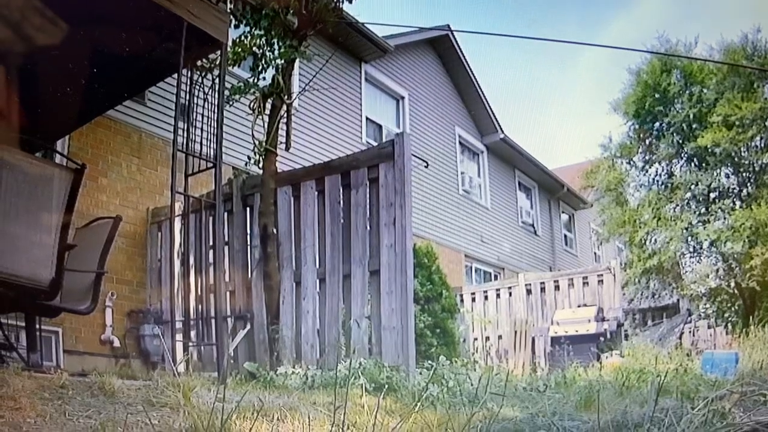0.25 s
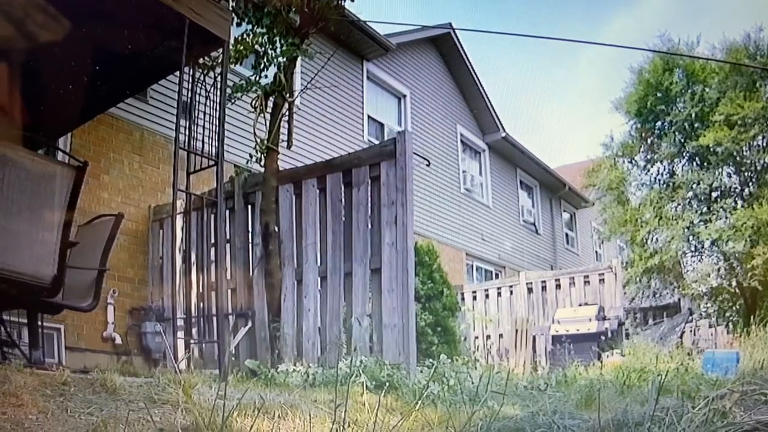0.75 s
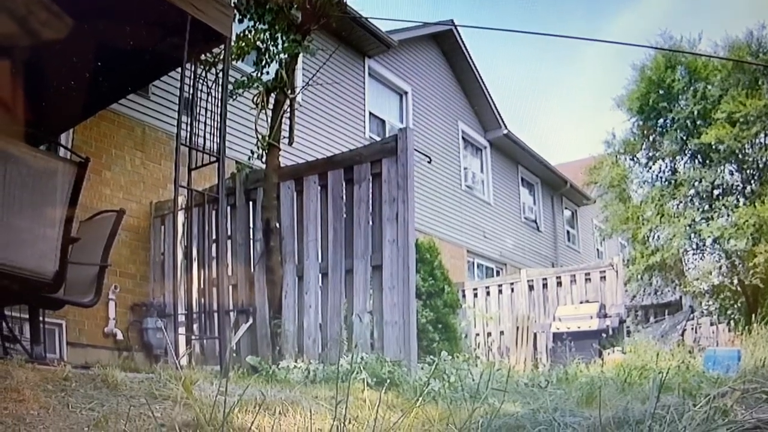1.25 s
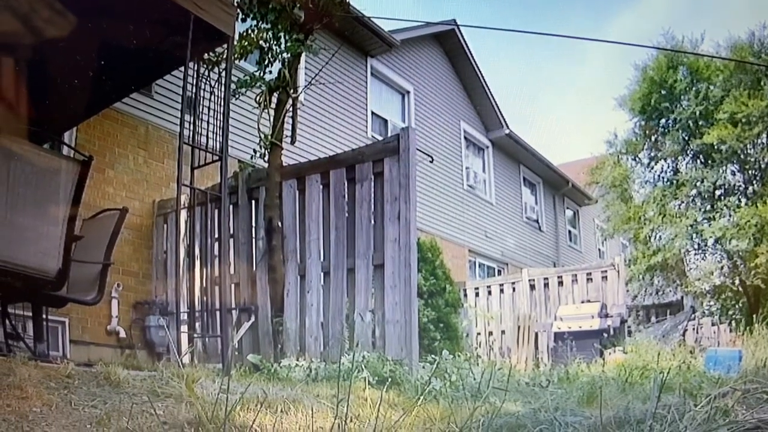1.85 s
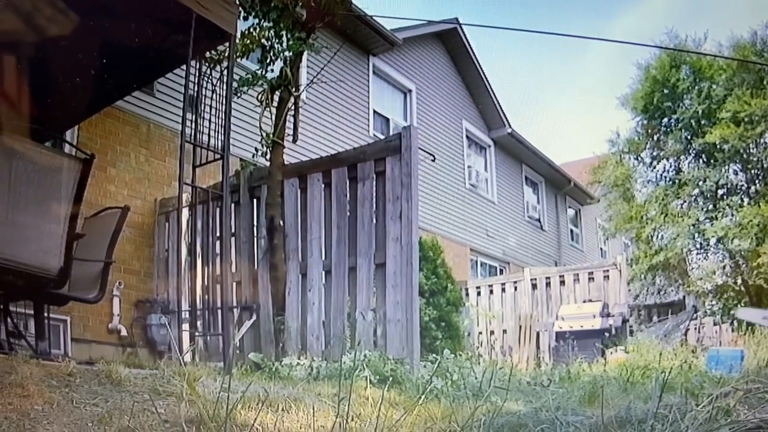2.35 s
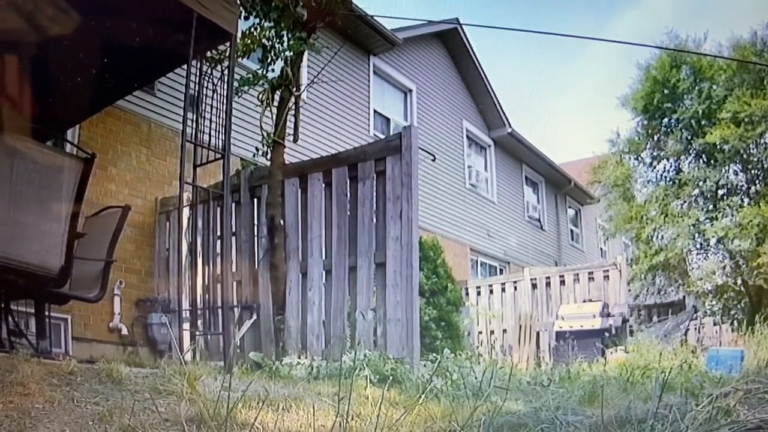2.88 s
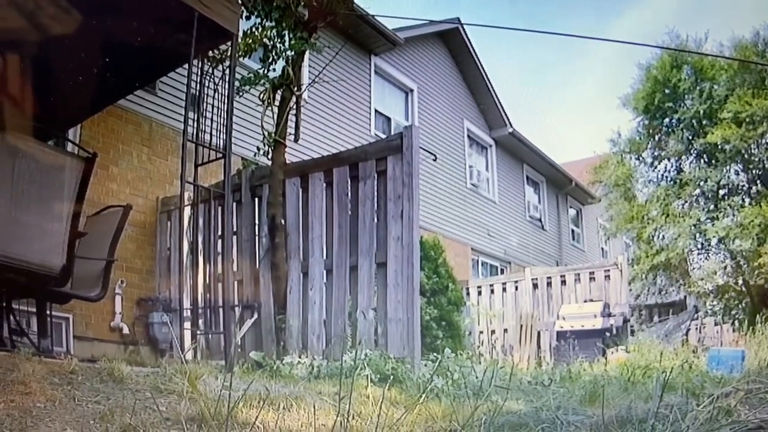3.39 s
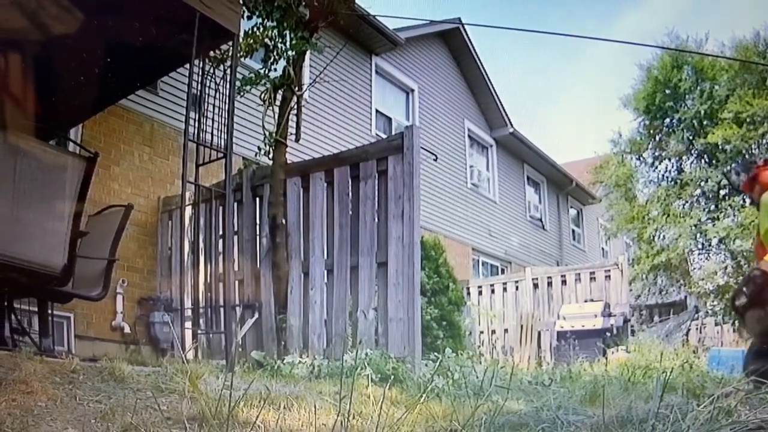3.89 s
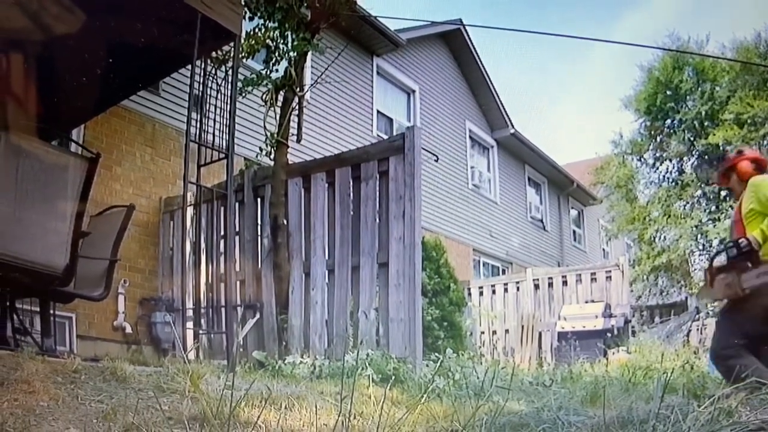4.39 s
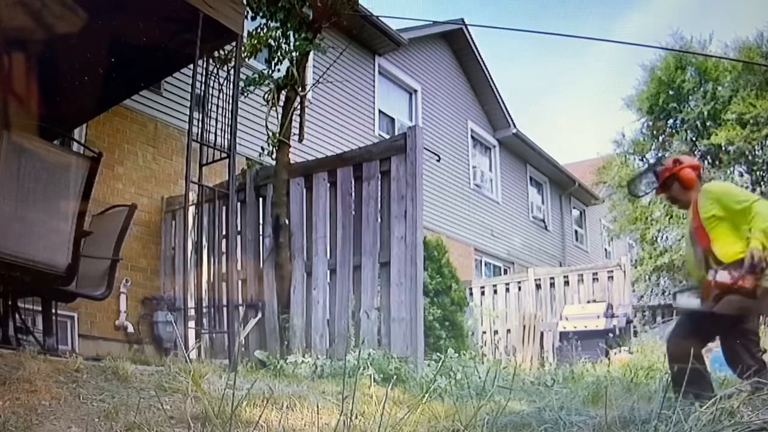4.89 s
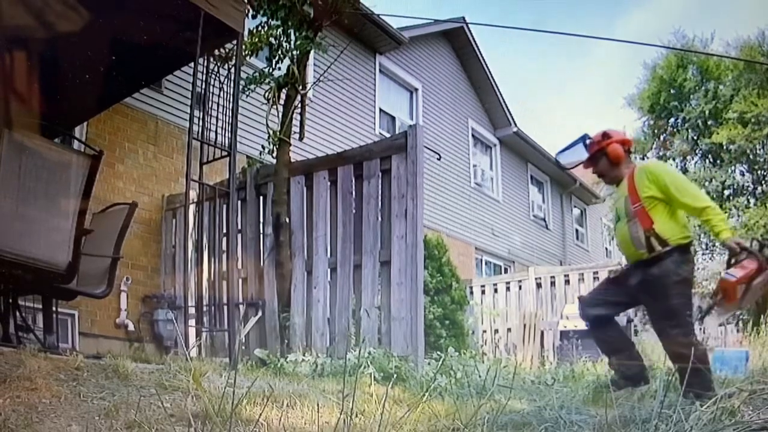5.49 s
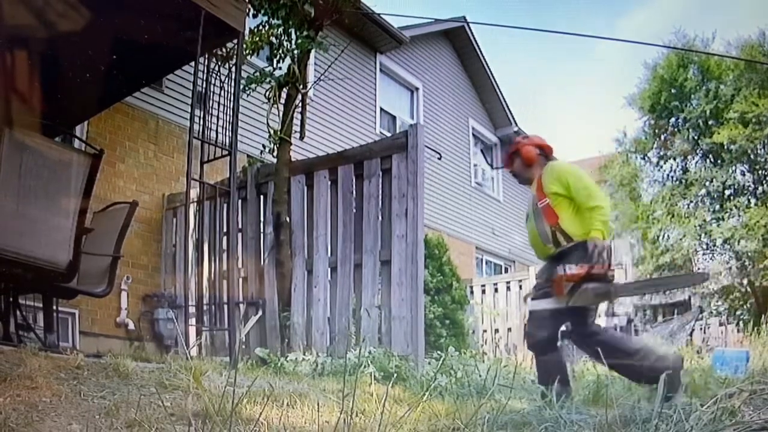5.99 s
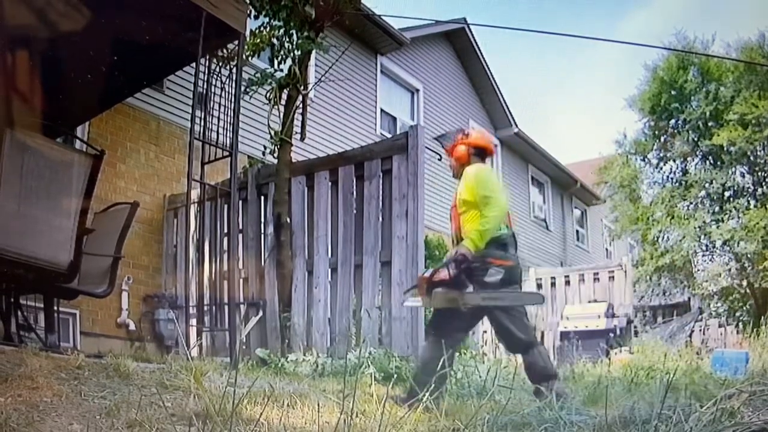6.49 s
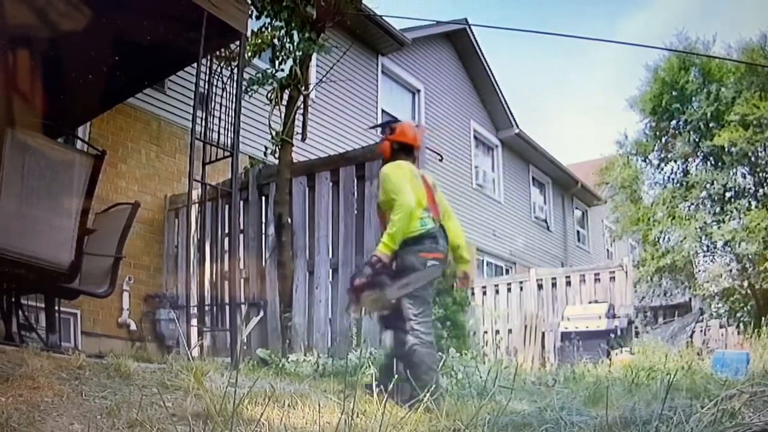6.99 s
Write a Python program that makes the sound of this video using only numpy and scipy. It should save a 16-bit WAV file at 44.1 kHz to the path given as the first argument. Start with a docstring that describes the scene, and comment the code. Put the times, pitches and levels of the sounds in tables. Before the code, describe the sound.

Outdoors in a backyard, a gas chainsaw gives a few weak pops, catches and chugs in lumpy cold rhythm. It smooths out, is blipped once in a hard, rising bark, and sinks back to rough idle. Then it is carried, its loose chain snatching and clacking on the bar, with faint boot thuds on grass. Fence and house walls return short echoes; the microphone is slightly hollow.

```python
"""A two-stroke chainsaw coughs, catches and chugs on the ground, is revved once, and sinks back to idle.
It is then carried, its loose chain clacking on the bar; ground, fence and walls throw the sound back.
Crank turns drive the exhaust puffs, the rasp of gas and the shaking metal, as pulses and noise through
resonances; their levels follow warmth, speed, throttle and the way the saw is held.
Boots thud softly on the lawn, over low rumble and faint hiss."""
import sys
import numpy as np
from scipy import signal
from scipy.fft import rfft, irfft
from scipy.io import wavfile
from scipy.ndimage import uniform_filter1d

SR = 44100
rng = np.random.default_rng(int(sys.argv[2]) if len(sys.argv) > 2 else 0)


def put_to_file(sound):
    """Save the sound as 16-bit audio at rate SR, in the file named by the first command-line argument."""
    columns = np.atleast_2d(sound).T  # one column per channel
    safe = np.clip(columns, -1, 1)
    whole_steps = np.round(safe * 32767)
    wavfile.write(sys.argv[1], SR, whole_steps.astype(np.int16))


N = 319725
TIME = np.arange(N) / SR

# Chain snatches at the bar. Each row: time in seconds, relative snap level in dB, knock in dB re snap.
CHAIN_CLACKS = [(3.1065, -12.5, -5), (3.4351, -12.5, -3), (3.526, -24.5, 7), (3.706, -24.5, -8),
                (3.7702, -27, 7), (3.902, -17.5, 0.5), (3.983, -24, -9), (4.029, -16.5, -2),
                (4.498, -22, -3.5), (4.564, -17.5, -0.5), (4.6438, -19, 1.5), (4.736, -19, 1.5),
                (4.9066, -23.5, 6), (5.0006, -30, 7), (5.2095, -26.5, 6.5), (5.3035, -27, 8.5),
                (5.6101, -27, 3), (5.8245, -24.5, 4), (5.9184, -25, 3.5), (6.0106, -21.5, 0.5),
                (6.056, -34, -2), (6.088, -31, -5.5), (6.222, -27.5, -7), (6.3504, -18, -3),
                (6.639, -17, -4), (6.7357, -16.5, -6), (6.816, -22, -8), (6.886, -38, -9), (6.932, -29, -6),
                (7.084, -26.5, -7), (7.1483, -18.5, -1.5)]
# Lift of the saw off the ground. Each row: time in seconds, share 0-1.
LIFTED = [(2.0, 0.16), (2.55, 0.07), (2.8, 0.25), (3.4, 0.99), (7.2, 0.99)]
# Turning away of the outlet. Each row: time in seconds, share 0-1.
TURNED_AWAY = [(3.3, 0.01), (4.0, 0.23), (4.7, 0.32), (5.4, 0.83), (5.75, 1), (6.2, 0.65), (6.6, 0.87),
               (7.2, 0.64)]
# Strong pairs of puffs while cold, in spells of one rhythm. Each row: start in seconds, turns per pair,
# level of the first puff in dB, second puff in dB re first.
COLD_SPELLS = [(.5237, 7, -19.5, -6), (.628, 3, -17.2, -6), (.6995, 3, -18, -6), (.7557, 4, -17, 1.5),
               (.8145, 4, -17.5, -7), (.8427, 4, -17.5, 1), (.9, 4, -14.4, -2), (1.1174, 5, -15.3, -1),
               (1.1912, 4, -17.5, 0), (1.2941, 4, -14.7, -1.3), (1.4123, 4, -17, 1.5), (1.7085, 4, -16, -4),
               (1.7686, 6, -16, -8), (1.858, 5, -18.5, -.5), (1.934, 3, -19.3, -2)]
# Single pops. Each row: time in seconds, level into the muffler in dB, crack level at the port in dB.
STRAY_POPS = [(.004, -39.5, -56), (.3746, -27.5, -37), (.445, -30, -42), (.4883, -23, -36), (.54, -36, -27),
              (.553, -19.5, -41), (.566, -18, -31), (.602, -23, -27), (1.768, -47, -28), (2.037, -21, -26),
              (2.1, -18.5, -23.5), (2.909, -19, -23)]
# Exhaust level: dB at warm idle on the ground, then dB added when cold, at top speed, on open throttle,
# lifted, turned away.
EXHAUST_LEVELS = (-25.5, -7, 2, 2, -5.5, -4)
# Resonances of the muffler held at the hip, the exhaust port, the engine case, and the bar with its chain.
# Each row: centre in Hz, width in Hz, level in dB.
HELD_MUFFLER_MODES = [(277, 28, -10.5), (455.5, 71, 2), (637.5, 90, 2), (844, 137, -4.5), (1291, 47, -15.5)]
PORT_MODES = [(1207, 75, 2), (1668, 129, 4.5), (1877, 216, -1.5), (2198, 129, -4.5)]
CASE_MODES = [(2997, 320, 0.0084), (3322, 276, 0.18)]
BAR_MODES = [(4064, 200, 8.5), (4470, 133, 16), (4744, 64, 16), (5155, 270, 10.5), (5805, 730, 6.5),
             (6990, 340, 3), (7814, 203, 5), (10045, 209, 7.5), (10826, 156, 14), (11570, 420, 5.5),
             (14850, 330, -7)]

# one blip of the throttle: the speed climbs evenly to its top, then runs down
OPEN_S, SHUT_S, TOP_HZ, RUN_DOWN_S, RUN_DOWN_SHAPE = 2.408, 2.575, 117.5, .34, 1.2
FIRST_BARK_S, LAST_BARK_S = 2.4245, 2.5555  # first and last firing on open throttle
CATCH_S, WARM_S = 0.4865, 1.98  # the engine catches; its cold rhythm ends


def amp(db):
    """Decibels to gain."""
    return 10 ** (np.asarray(db) / 20)


def unit(x):
    """Scales to rms 1."""
    return x / np.sqrt(np.mean(x ** 2) + 1e-20)


def ramp(t, start_s, length_s):
    """Rises evenly from 0 to 1."""
    return np.clip((t - start_s) / length_s, 0, 1)


def curve(rows, t):
    """A time table, read at times t."""
    return np.interp(t, *np.transpose(rows))


def read(points, hz):
    """A spectrum table, read on a log-frequency axis."""
    point_hz, value = np.transpose(points)
    return np.interp(np.log(hz + 1), np.log(point_hz + 1), value)


def add(mix, s, sound):
    """Mixes a sound in at time s."""
    part = mix[max(round(s * SR), 0):][:len(sound)]
    part += sound[:len(part)]


def ring(x, modes, size=8192):
    """Passes x through steep-sided resonances: a causal filter of energy 1."""
    hz = np.fft.rfftfreq(size, 1 / SR)
    power = sum(amp(db) ** 2 / (1 + ((hz - f) / width) ** 2) ** 3 for f, width, db in modes)
    log_gain = np.log(power + 1e-9) / 2
    circle = np.r_[log_gain, log_gain[-2:0:-1]]
    # minimum phase, from the Hilbert transform of the log gain
    spectrum = np.exp(np.conj(signal.hilbert(circle)))
    response = np.fft.ifft(spectrum).real[:size // 2]
    return signal.oaconvolve(x, response / np.linalg.norm(response))[:len(x)]


def noise(spectrum):
    """Steady noise of rms 1 with the given spectrum."""
    gain = amp(read(spectrum, np.fft.rfftfreq(N, 1 / SR)))
    return unit(irfft(rfft(rng.standard_normal(N)) * gain, N))


def slow_noise(window):
    """Noise of rms 1, smoothed over a window in samples."""
    return unit(uniform_filter1d(rng.standard_normal(N), window))


def revved(t):
    """How far the speed stands between idle (0) and its top (1)."""
    run_down = np.exp(-(np.maximum(t - SHUT_S, 0) / RUN_DOWN_S) ** RUN_DOWN_SHAPE)
    return ramp(t, OPEN_S, SHUT_S - OPEN_S) * run_down


def speed(t, surge_hz=2.2, surge_s=.035):
    """Turns of the crank a second: idle, the blip, and a brief surge with each hard snatch of the chain."""
    # Speed with the throttle shut. Each row: time in seconds, turns per second.
    idle_speed = [(.48, 55), (.62, 71), (1.2, 67.5), (2.1, 65.6), (2.39, 63.5), (2.6, 60), (3.9, 59.5),
                  (4.3, 61.4), (4.56, 59), (4.85, 62.2), (5.5, 61), (5.7, 59.3), (6.35, 62), (6.7, 58.2),
                  (7.25, 59.3)]
    clack_s, snap_db, knock_db = np.transpose(CHAIN_CLACKS)
    hard = ramp(snap_db + knock_db, -33, 6)
    since = np.maximum(np.subtract.outer(t, clack_s), 0) / surge_s
    surge = surge_hz * (hard * since * np.exp(1 - since)).sum(-1)
    return curve(idle_speed, t) * (1 - revved(t)) + TOP_HZ * revved(t) + surge


def coast(t):
    """Share of the exhaust that merges into a pumping tone, from throttle shut until it fires again."""
    most, snap_s, refire_s, blend_s = .78, .012, 2.82, .1
    return most * ramp(t, SHUT_S - snap_s, snap_s) * (1 - ramp(t, refire_s, blend_s))


def unevenness(t):
    """How unevenly the engine fires: more when it is carried, much less above idle speed."""
    return (.6 + .4 * curve(LIFTED, t)) * (1 - .7 * revved(t) ** .4)


def level(part, t):
    """A part's level in dB, from the state of the engine and the way the saw is held."""
    throttle_s, warming_s, starting_db, catch_db_per_s = 0.017, 0.25, -23, 705.5
    idle_db, cold_db, speed_db, throttle_db, lifted_db, turned_db = part
    start = np.clip((t - CATCH_S) * catch_db_per_s, starting_db, 0)
    throttle = ramp(t, OPEN_S, throttle_s) - ramp(t, SHUT_S - throttle_s, throttle_s)
    engine = idle_db + start + cold_db * (1 - ramp(t, WARM_S, warming_s))
    engine = engine + speed_db * revved(t) + throttle_db * throttle
    return engine + lifted_db * curve(LIFTED, t) + turned_db * curve(TURNED_AWAY, t)


def crank():
    """Turns of the crankshaft over time, and the whole turn on which each cold spell starts."""
    drift = .01 * slow_noise(SR // 20)
    turns = np.cumsum(speed(TIME) * (1 + drift * unevenness(TIME))) / SR
    # bend the phase so that the known firings fall on whole turns
    firing_s = np.r_[np.array(COLD_SPELLS)[:, 0], FIRST_BARK_S, LAST_BARK_S]
    at = np.interp(firing_s, TIME, turns)
    whole = round(at[0]) + np.r_[0, np.cumsum(np.round(np.diff(at)))]
    spells = whole[:len(COLD_SPELLS)].astype(int)
    return turns + np.interp(TIME, firing_s, whole - at), spells


def strokes(turns, spells, chug_db=18.0, puff_db=-2.5):
    """Time and strength of each puff: stray pops, strong pairs among weaker puffs while cold, then singles."""
    uneven_db, jitter_s, hardest = 1.2, .00017, 1.2
    at = np.interp(np.arange(int(turns[-1])), turns, TIME)
    luck, slip = rng.standard_normal((len(at), 2)).T * unevenness(at)
    luck = np.minimum(luck, hardest)
    db = level(EXHAUST_LEVELS, at) + 10 * np.log10(SR / speed(at)) + puff_db
    ends = np.r_[spells[1:], np.searchsorted(at, WARM_S)]
    for start, end, (_, every, first_db, second_db) in zip(spells, ends, COLD_SPELLS):
        pairs = np.arange(start, end, round(every))
        db[pairs] = first_db + chug_db
        db[pairs + 1] = first_db + chug_db + second_db
    strength = amp(db + uneven_db * luck) * np.sqrt(1 - coast(at)) * (at > CATCH_S)
    pop_s, pop_db, _ = np.transpose(STRAY_POPS)
    return np.r_[pop_s, at + jitter_s * slip], np.r_[amp(pop_db + chug_db), strength], luck


def firing_pulses(at):
    """One unit click per puff."""
    pulses = np.zeros(N)
    pulses[np.clip((at * SR).astype(int), 0, N - 1)] = 1
    return pulses


def yard_air():
    """Faint hiss and low rumble as shaped noise: the middle signal and the side signal."""
    # Spectra of hiss and rumble. Each row: frequency in Hz, relative density in dB per Hz.
    hiss_spectrum = [(12, -67), (20, -23), (62, -7), (97, -14), (147, -18), (194, -19.5), (603, -22),
                     (1110, -22), (1240, -29), (2410, -33), (8160, -51), (8860, -80), (15000, -50)]
    rumble_spectrum = [(12, -46), (20, -14.5), (55, 6), (68, 2), (86, -28), (108, -3), (168, -23),
                       (200, -15), (260, -25), (440, -120)]
    rumble_gain = curve([(.3, 0.37), (.55, 0.81)], TIME)
    middle = amp(-53.5) * noise(hiss_spectrum) + amp(-52) * noise(rumble_spectrum) * rumble_gain
    return middle, amp(-64.5) * noise(hiss_spectrum)


def footsteps(thud_s=0.029):
    """Dull thuds of boots on the lawn: swelling, fading noise through low ground resonances."""
    # Each row: time in seconds, level in dB.
    boot_steps = [(4.622, -49), (5.17, -46), (5.788, -40)]
    t = np.arange(SR // 3) / SR
    shape = t / thud_s * np.exp(1 - t / thud_s)
    drive = np.zeros(N)
    for s, db in boot_steps:
        add(drive, s, amp(db) * shape * rng.standard_normal(len(t)))
    return ring(drive, [(35, 14, 0), (63.4, 41, -1)])


def intake(at, uneven_db=4):
    """The air intake throbs, fading in as the back of the saw comes round: one gulp per puff rings it."""
    # Each row: centre in Hz, width in Hz, level in dB.
    intake_modes = [(151, 34, -5), (291, 52, 4), (404, 25, 3.5)]
    gulps = firing_pulses(at) * amp(uneven_db * slow_noise(SR // 100))
    fade_in = ramp(TIME, 5.58, 0.72)
    return amp(-49.5) * unit(ring(gulps, intake_modes)) * fade_in


def shaken(turns, luck, steady, decay_turns, swing_db, grain_db):
    """Grainy noise that flares once a turn, more strongly on a hard firing."""
    turn = np.clip(turns.astype(int), 0, len(luck) - 1)
    flare = np.exp(-(turns % 1) / decay_turns) * amp(swing_db * luck[turn])
    grains = amp(grain_db * slow_noise(SR // 700))
    return unit((steady + flare) * grains * rng.standard_normal(N))


def case_clatter(turns, luck):
    """Piston and clutch clatter: noise flaring each turn shakes the case."""
    # Level columns as in EXHAUST_LEVELS.
    clatter_levels = (-43.5, -0.5, 5, 6.5, -0.5, -8)
    # Slow rise and fall of the clatter. Each row: time in seconds, added level in dB.
    clatter_swell = [(.5, -3), (.8, 2.5), (1.1, -1.5), (1.45, 1.5), (2.2, -0.5), (3.6, -0.5), (5.1, 0.5),
                     (6.05, 8.5), (6.4, 7.5)]
    piston = shaken(turns, luck, steady=.8, decay_turns=0.36, swing_db=6, grain_db=3.5)
    return ring(piston * amp(level(clatter_levels, TIME) + curve(clatter_swell, TIME)), CASE_MODES)


def chain_hiss(turns, luck):
    """The chain hisses on the bar: noise flaring each turn excites the steel."""
    # Level columns as in EXHAUST_LEVELS.
    hiss_levels = (-45.5, -3, 5.5, 9.5, 0, -1.5)
    # Slow rise and fall of the hiss. Each row: time in seconds, added level in dB.
    hiss_loudness = [(2.7, -1), (3.0, -1.5), (3.7, 1.5), (4.3, 3), (5.3, 1), (6.75, 2), (6.92, 4),
                     (7.1, .5)]
    links = shaken(turns, luck, steady=.7, decay_turns=.35, swing_db=4, grain_db=3.5)
    return ring(links * amp(level(hiss_levels, TIME) + curve(hiss_loudness, TIME)), BAR_MODES)


def gas_rasp(turns, at, luck):
    """Gas rasps out of the port: swirling noise mixed with clean pulses, cleaner at speed and when lifted."""
    # Level columns as in EXHAUST_LEVELS.
    rasp_levels = (-43, -3.5, 5.5, 7.5, 4.5, -6.5)
    # Slow rise and fall of the rasp. Each row: time in seconds, added level in dB.
    rasp_loudness = [(1.8, -2), (2.2, -1.5), (2.9, 2), (5.3, -1.5), (5.75, 4.5), (6.3, -2), (7.1, -1)]
    clean = np.clip(.04 + .25 * curve(LIFTED, TIME) + .75 * np.sqrt(revved(TIME)), 0, .85)
    swirl = shaken(turns, luck, steady=.6, decay_turns=0.25, swing_db=3, grain_db=4)
    gas = np.sqrt(clean) * unit(firing_pulses(at)) + np.sqrt(1 - clean) * swirl
    return ring(gas * amp(level(rasp_levels, TIME) + curve(rasp_loudness, TIME)), PORT_MODES)


def clacks(snap_db=-2, rise_s=0.000062, grain_db=3.5, case_db=-5, port_db=-2, knock_db=16, tick_db=-8.5):
    """Link-on-steel impacts and their rebound ring bar and case, sing at varying pitch and knock the saw."""
    # Singing of the bar. Each row: centre in Hz before detuning, width in Hz, level in dB.
    clink_modes = [(2810, 60, 15), (3315, 116, 12), (4360, 250, 2.5), (5440, 110, -4), (7260, 310, -14.5)]
    decay_s, clink_db, turned_db, detune, rebound, rebound_s = .002, -4, 6, .08, .25, (.003, .009)
    t = np.arange(SR // 20) / SR
    shape = (1 - np.exp(-t / rise_s)) * np.exp(-t / decay_s)
    norm = np.linalg.norm(shape / shape.max()) / np.sqrt(2)
    snap, knock, push, clink = np.zeros((4, N))
    for s, db, body_db in CHAIN_CLACKS:
        size, sign = rng.standard_normal((2, len(t)))
        envelope = shape + rebound * np.interp(t - rng.uniform(*rebound_s), t, shape)
        burst = envelope * amp(grain_db * size) * sign
        burst *= norm / np.linalg.norm(burst)
        add(snap, s, amp(db) * burst)
        add(knock, s, amp(db + body_db) * burst)
        add(push, s, amp([db + body_db + knock_db]))
        detuned = [(hz * (1 + detune * rng.uniform(-0.97, 1)), width, mode_db)
                   for hz, width, mode_db in clink_modes]
        add(clink, s, amp(db) * ring(burst, detuned))
    singing = amp(clink_db + turned_db * curve(TURNED_AWAY, TIME)) * clink
    steel = ring(snap, BAR_MODES) + amp(case_db) * ring(snap, CASE_MODES) + singing
    tick = amp(tick_db) * ring(snap, [(6530, 1340, 21), (11500, 800, 19.6), (13500, 1440, 4.9)])
    body = amp(port_db) * ring(knock, PORT_MODES) + ring(push, HELD_MUFFLER_MODES[1:])
    return amp(snap_db) * (steel + tick) + body


def coasting(turns, count=26):
    """Running down, the piston pumps a clean tone whose harmonics glide through the muffler's resonances."""
    # Each row: centre in Hz, width in Hz, level in dB.
    pumping_modes = [(478, 67, 5.5), (558, 65, 1), (885, 78, 3.5), (1167, 33, -12), (1580, 130, -10.5)]
    smear = .25  # radians, times harmonic number squared
    tone = sum(np.cos(2 * np.pi * k * turns - smear * k ** 2) for k in range(2, count))
    return unit(ring(tone, pumping_modes)) * amp(level(EXHAUST_LEVELS, TIME)) * np.sqrt(coast(TIME))


def cracks(decay_s=0.002):
    """Each pop spits a short burst of gas from the port."""
    t = np.arange(SR // 30) / SR
    drive = np.zeros(N)
    for s, _, db in STRAY_POPS:
        add(drive, s, amp(db) * np.exp(-t / decay_s) * rng.standard_normal(len(t)))
    return ring(drive, PORT_MODES)


def barks(at, top_db=4, growth_db=2):
    """On open throttle every firing is one hard, clean bark, growing with the speed."""
    # Resonances of the wide-open exhaust. Each row: centre in Hz, width in Hz, level in dB.
    bark_modes = [(602, 30, 10), (910, 72, 10), (1250, 58, -10), (1646, 140, 3), (1800, 160, -4),
                  (3080, 220, -14)]
    slack_s = .003
    drive = np.zeros(N)
    for s in at[(at > FIRST_BARK_S - slack_s) & (at < LAST_BARK_S + slack_s)]:
        add(drive, s, amp([top_db + growth_db * (revved(s) - 1)]))
    return ring(drive, bark_modes)


def droop(x, hz=450, width_hz=800):
    """An allpass holds the low notes back a little, so that each puff falls in pitch."""
    poles = signal.iirpeak(hz, hz / width_hz, SR)[1]
    return signal.lfilter(poles[::-1], poles, x)


def exhaust(at, strength, bass_hz=275, port_db=-28):
    """Each puff is a pressure pulse with a trail of turbulence, ringing the muffler and the port."""
    # Resonances on the ground, and the upper one. Each row: centre in Hz, width in Hz, level in dB.
    ground_modes = [(273, 135, -23), (534.6, 39.4, 6.5), (643, 90, 7.5), (961, 39.4, -6),
                    (1296, 6.9, -23.5)]
    upper_mode = [(953, 68, -29)]
    # Slow rise and fall of the upper resonance. Each row: time in seconds, gain in dB.
    upper_loudness = [(2.85, -4.5), (3.15, -6.5), (3.6, -8.5), (4.05, -2), (4.4, -2.5), (4.85, -1.5),
                      (5.5, -9.5), (6.2, -5), (6.8, -18)]
    t = np.arange(SR // 70) / SR
    trail = .04 * np.exp(-t / .003)
    drive = np.zeros(N)
    for s, size, uneven in zip(at, strength, unevenness(at)):
        puff = uneven * trail * rng.standard_normal(len(t))
        puff[0] += 1
        add(drive, s, size * puff)
    # so small an outlet radiates little bass
    drive = signal.sosfilt(signal.butter(4, bass_hz, "highpass", fs=SR, output="sos"), drive)
    falling = droop(drive)
    lift = curve(LIFTED, TIME)
    held = falling * np.sqrt(lift)
    muffled = ring(falling * np.sqrt(1 - lift), ground_modes) + ring(held, HELD_MUFFLER_MODES)
    muffled += ring(held, upper_mode) * amp(curve(upper_loudness, TIME))
    return muffled + amp(port_db) * ring(drive, PORT_MODES)


def yard(x, tail_db=-9, t60_s=0.47, sway_per_s=.04, taps_per_s=2000):
    """Single echoes whose delays shrink as the saw moves, and two short tails of sparse random echoes."""
    # Ground, fence and walls. Each row: delay in seconds before the saw moves, level in dB.
    wall_echoes = [(.0021, -30), (.0047, -24), (.0088, -16.5), (.0162, -19.5), (.0305, -11), (.0345, -11.5),
                   (.0445, -14.5)]
    moved = 1 - sway_per_s * np.maximum(TIME - 2.5, 0)
    near = x + sum(amp(db) * np.interp(TIME - delay_s * moved, TIME, x, left=0)
                   for delay_s, db in wall_echoes)
    t = np.arange(SR // 2) / SR
    sparse = rng.random((2, len(t))) < taps_per_s / SR
    taps = rng.standard_normal((2, len(t))) * sparse * (t > .008) * amp(-60 * t / t60_s)
    taps /= np.linalg.norm(taps, axis=1, keepdims=True)
    return near, amp(tail_db) * signal.fftconvolve(x[None], taps, axes=1)[:, :N]


def ports(x):
    """Two microphone ports hear one sound with different phase and level."""
    # Each row: frequency in Hz, lead of the left port in radians.
    left_lead = [(50, .2), (250, .36), (600, .72), (4000, 1.1), (11000, 1.25), (13000, 2.6)]
    # Each row: frequency in Hz, left minus right in dB.
    left_tilt = [(60, 0.5), (99, 1.5), (160, -4.5), (270, 2.5), (450, -0.5), (740, 3), (1220, 2.5),
                 (2010, 0), (3330, 2.0), (5500, 4.0), (9080, -1), (15000, 0.5)]
    hz = np.fft.rfftfreq(N, 1 / SR)
    half = amp(read(left_tilt, hz) / 2) * np.exp(1j * read(left_lead, hz) / 2)
    pair = np.array([half, 1 / half])
    # keep the mean of both ports even, with a floor where they cancel
    return irfft(rfft(x) * pair / np.maximum(abs(pair.mean(0)), .45), N)


def scene(apart=0.38, direct=0.61):
    """The saw and its echoes over the low rumble and faint hiss of the yard."""
    turns, spells = crank()
    at, strength, luck = strokes(turns, spells)
    air, air_side = yard_air()
    straight = clacks() + coasting(turns)  # these carry little echo
    machinery = gas_rasp(turns, at, luck) + case_clatter(turns, luck) + chain_hiss(turns, luck)
    engine = exhaust(at, strength) + cracks() + barks(at) + intake(at) + machinery
    near, tail = yard(engine + .5 * straight)
    side = apart * tail[1] + air_side
    middle = near + direct * straight + tail[0] + air + footsteps()
    return ports(middle) + side * np.array([[1], [-1]])


def record(dry, edge_hz=16300):
    """Narrow dips give the microphone's hollow colour; a lowpass sets the band limit."""
    # Each row: centre in Hz, width in Hz, depth 0-1.
    mic_dips = [(1080, 75, 1), (1313, 28, 0), (2520, 76, 0.43), (3680, 73, 0.7), (5410, 160, 1),
                (7230, 67, 1)]
    for hz, width_hz, depth in mic_dips:
        dry = dry - depth * signal.lfilter(*signal.iirpeak(hz, hz / width_hz, SR), dry)
    lowpass = signal.firwin(511, edge_hz, window=("kaiser", 9), fs=SR)
    return signal.oaconvolve(dry, lowpass[None], "same")


dry = scene()
out = record(dry)
put_to_file(out)
```